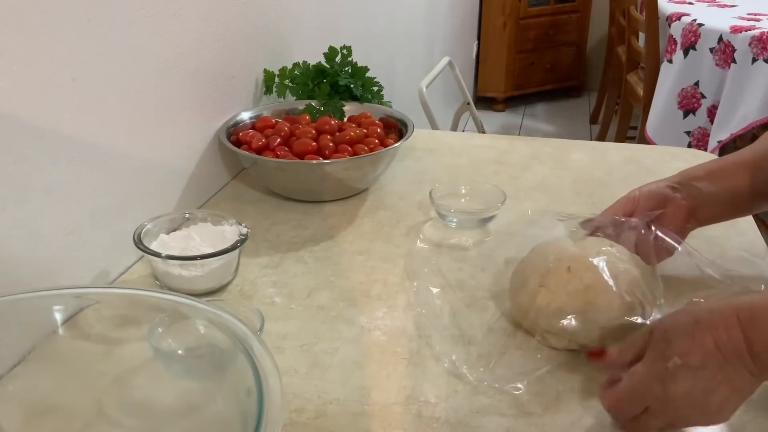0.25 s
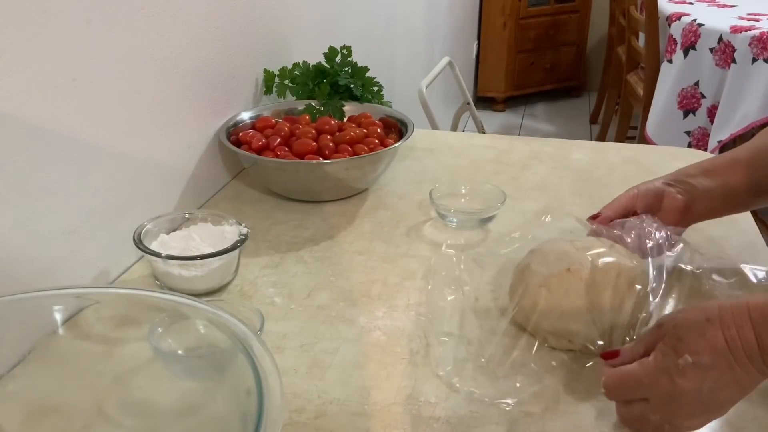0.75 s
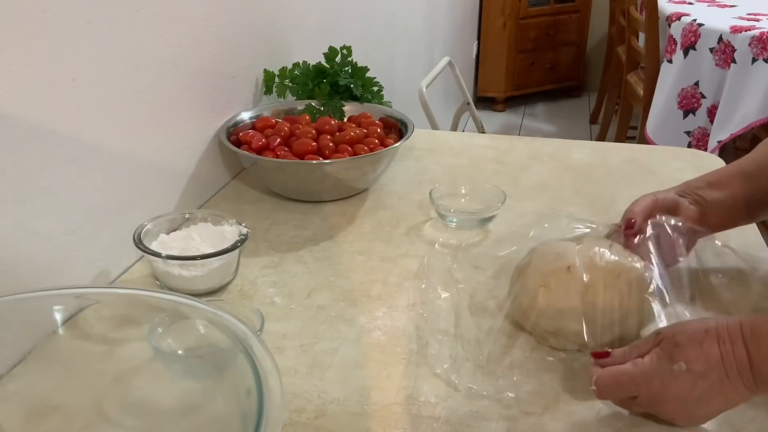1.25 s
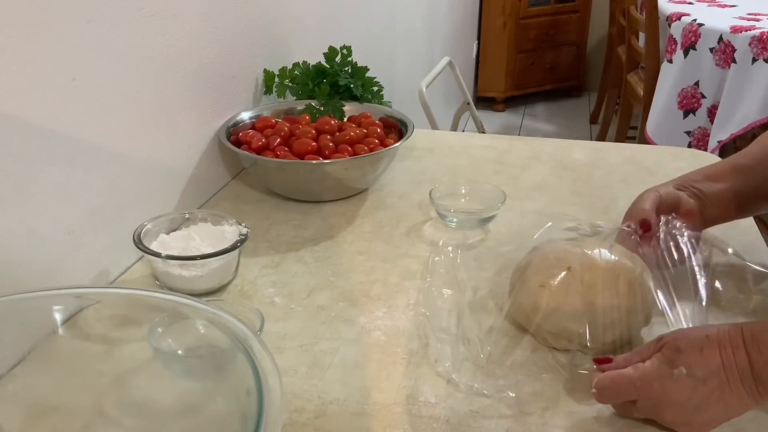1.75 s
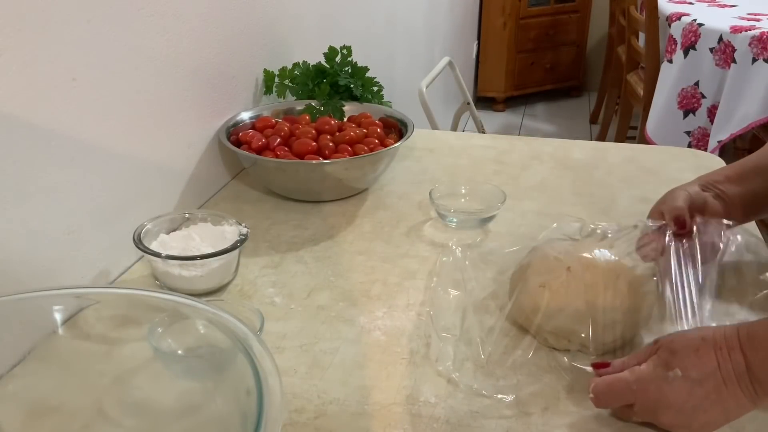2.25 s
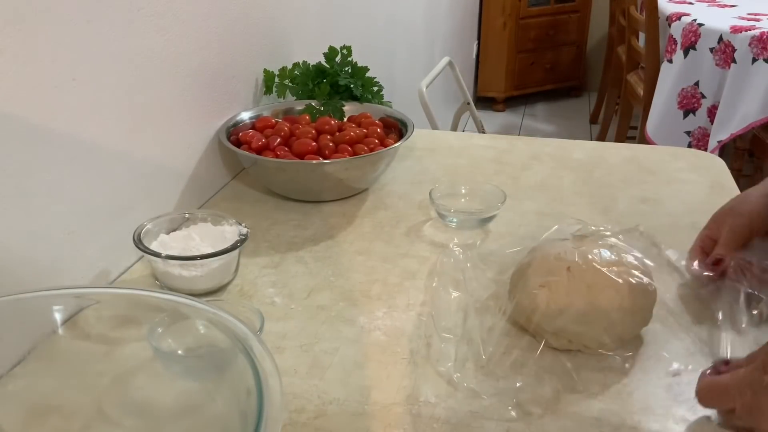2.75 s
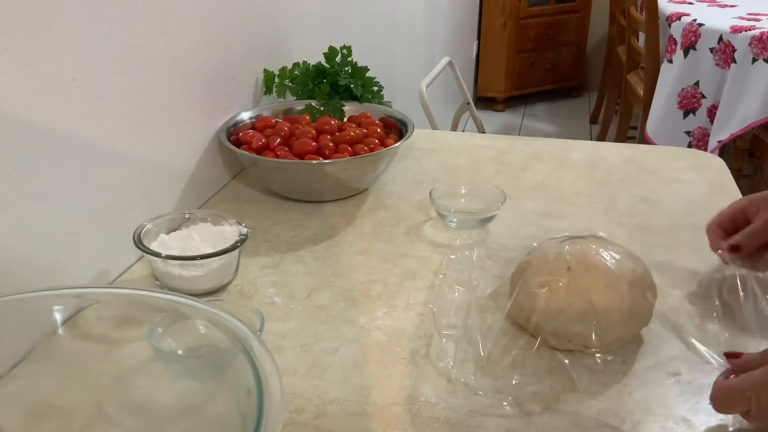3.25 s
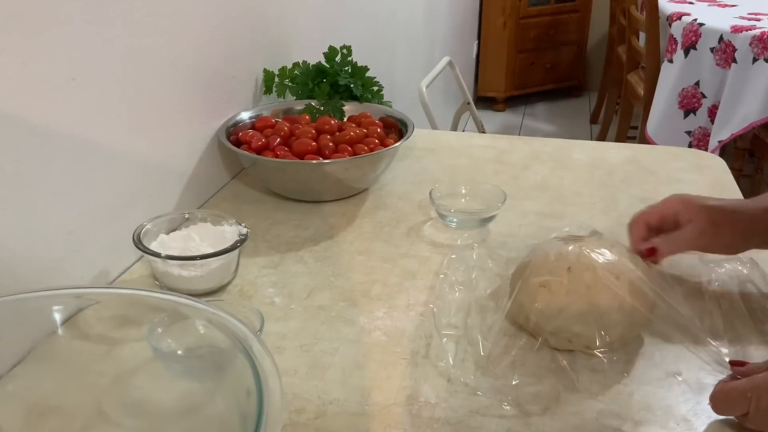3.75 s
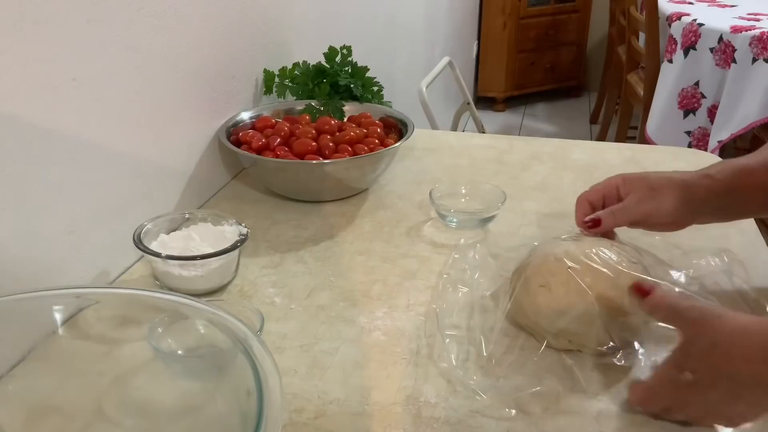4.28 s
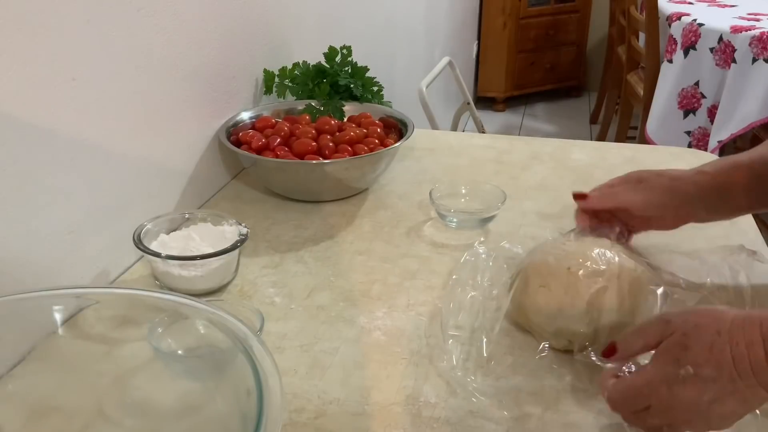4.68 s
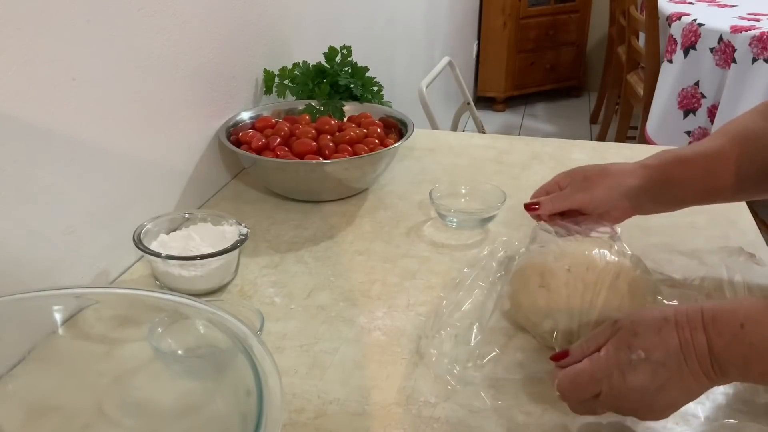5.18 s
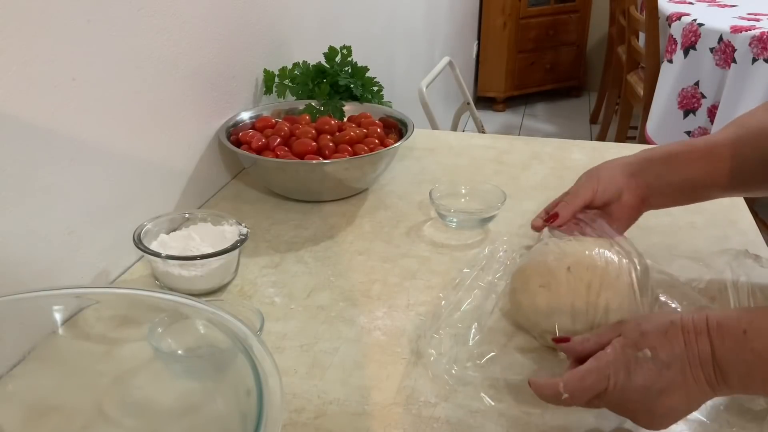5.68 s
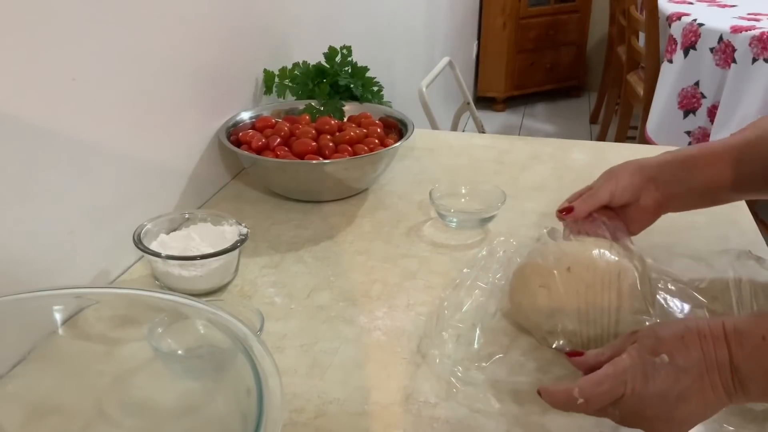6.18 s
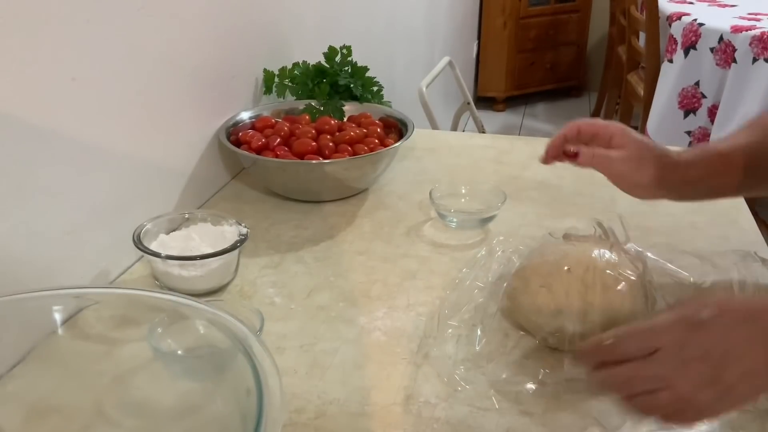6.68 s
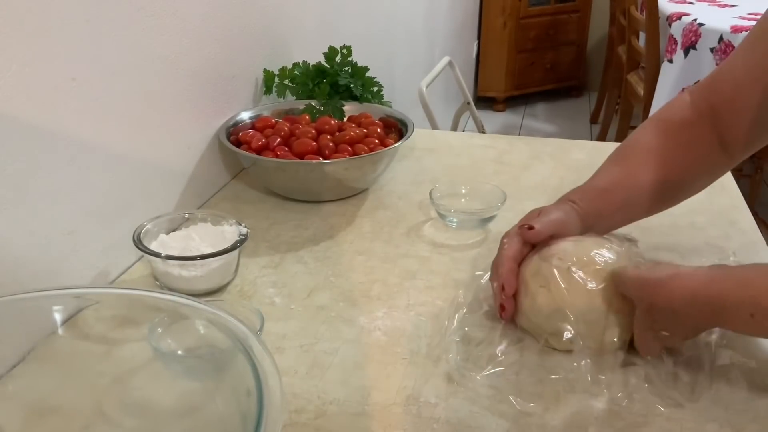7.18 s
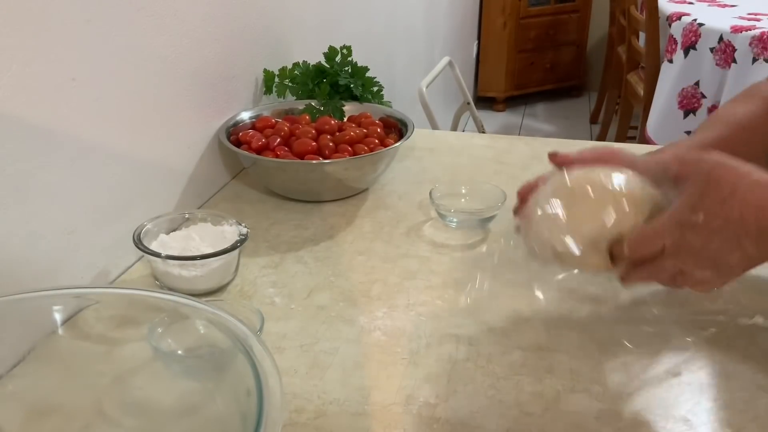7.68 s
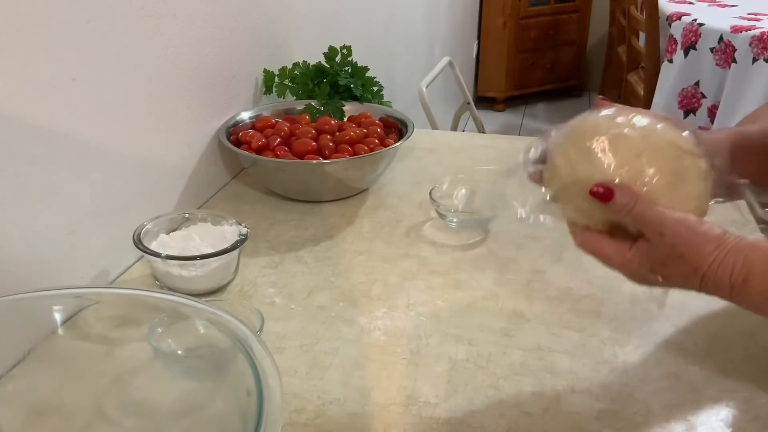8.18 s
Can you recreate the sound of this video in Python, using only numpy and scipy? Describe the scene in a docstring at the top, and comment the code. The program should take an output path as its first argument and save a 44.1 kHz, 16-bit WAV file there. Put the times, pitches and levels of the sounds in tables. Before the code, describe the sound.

In a hard-walled kitchen, hands work thin plastic film over dough on a table. Fine high clicks swarm and stop, with separate crisp snaps on top. Early pulls are light with muffled knocks, then the film pops strongly near three seconds, eases into gentle crinkles, and crackles again at the end. The microphone is near, the film right of centre, with a short room tail and a weak low hum.

```python
"""Cling film at a kitchen table

Cling film is pulled, folded and wrapped around dough, to the right of a stereo microphone close by.
The sheet buckles in swarms of random tiny clicks, and listed creases snap with a sharp click and a chatter.
Hands and dough bump the table: noise knocks and scuffs over decaying sines of the table top.
Decaying noise tails give the hard-walled kitchen; wavering tones and shaped noise hum as an appliance."""
import sys
import numpy as np
from scipy import signal
from scipy.fft import rfft, irfft, next_fast_len
from scipy.io import wavfile
from scipy.ndimage import uniform_filter1d, map_coordinates

SR = 44100
rng = np.random.default_rng(int(sys.argv[2]) if len(sys.argv) > 2 else 0)


def dump(signal):
    """Clip the signal to [-1, 1] and save it as 16-bit WAV at the path in sys.argv[1]."""
    limited = np.clip(np.atleast_2d(signal).T, -1, 1)
    pcm = np.round(limited * 32767).astype(np.int16)
    wavfile.write(sys.argv[1], SR, pcm)


N = 372159  # length in samples
TOP_HZ = 15900  # band limit of the microphone

# colour of a click from one crease: (frequency [Hz], relative level [dB])
CREASE_COLOUR = [(200, -58), (800, -23), (1500, -9.5), (2500, -10.5), (5000, -6), (8000, -7.5), (10500, 0),
                 (12700, 5), (15600, 3.5)]


def amp(db):
    """Decibels to gain."""
    return 10 ** (np.asarray(db) / 20)


def unit(x):
    """Scale to rms 1."""
    return x / np.sqrt(np.mean(x ** 2) + 1e-20)


def along(points, hz):
    """Read (Hz, value) points on a log frequency axis."""
    point_hz, values = np.transpose(points)
    return np.interp(np.log(hz + 1), np.log(point_hz), values)


def wobble(rate):
    """A smooth random curve with rate knots a second."""
    knots = rng.standard_normal(int(N * rate / SR) + 4)
    return map_coordinates(knots, [np.arange(N) * rate / SR], order=2)


def filtered(x, response):
    """Multiply the spectrum of x by a response of frequency."""
    size = next_fast_len(N + 8192)
    spectrum = rfft(x, size) * response(np.fft.rfftfreq(size, 1 / SR))
    return irfft(spectrum, size)[..., :N]


def audible(x):
    """Root energy of a short sound below the band limit."""
    hz = np.fft.rfftfreq(len(x), 1 / SR)
    return np.linalg.norm(irfft(rfft(x) * (hz < TOP_HZ)))


def click(spectrum, ripple_db, size=512):
    """A causal click of audible energy 1 with the given colour and random resonances of its own."""
    hz = np.fft.rfftfreq(size, 1 / SR)
    ripple = unit(uniform_filter1d(rng.standard_normal(len(hz)), size=12))
    # folding the cepstrum onto positive times gives minimum phase: the energy comes first
    cepstrum = irfft(np.log(amp(along(spectrum, hz) + ripple_db * ripple)))
    cepstrum[1:size // 2] *= 2
    cepstrum[size // 2 + 1:] = 0
    pulse = irfft(np.exp(rfft(cepstrum)))
    return pulse / audible(pulse)


def add(track, s, sound):
    """Mix a sound into a track at time s."""
    part = track[max(round(s * SR), 0):][:len(sound)]
    part += sound[:len(part)]


def air(spectrum):
    """Steady stereo noise of rms 1, alike on both sides in the bass."""
    # background: (frequency [Hz], left-right correlation [-1 to 1])
    alike = [(40, 1), (120, 0.85), (300, 0.82), (450, 0.43), (600, 0.02), (1500, -0.0085)]

    def mid_side_gains(hz):
        turn = np.arccos(np.clip(along(alike, hz), -1, 1)) / 2
        return amp(along(spectrum, hz)) * [np.cos(turn), np.sin(turn)]

    mid, side = filtered(rng.standard_normal((2, N)), mid_side_gains)
    return unit(np.array([mid + side, mid - side]))


def appliance():
    """Motor tones wavering in level and phase, over a low drone and a faint hiss."""
    # motor tones: (frequency [Hz], rms level before the swell [dB], flutter [dB], phase wander [rad])
    hum = [(43.5, -72, -5, 0.99), (119.2, -67, -2, 0.66), (134, -69, -1, 1.07), (210.8, -68.5, 3.5, 0.64),
           (241, -78, 4, 3.6), (271.6, -65.5, 7, 0.88), (288.3, -67, 8, 1.03), (332, -64, 2.5, 0.99),
           (367, -68.5, 3.5, 1.17), (414.9, -63, 1.24, 0.76)]
    # the hum swells a little midway: (time [s], level [dB])
    swell = [(0, -6.5), (3.4, -2.5), (4, 4), (5.1, -1), (6.2, -3.5), (8.4, -5)]
    # noise colours: (frequency [Hz], relative level [dB])
    drone = [(15, -71), (25, -36), (48, -3), (91, -5.5), (105, -19), (124, 2.5), (178, -5.5), (267, 3.5),
             (301, 0), (330, 1), (389, -3), (419, -3.5), (438, -2), (541, -16), (900, -23.5), (1170, -29),
             (1980, -120)]
    hiss = [(300, 3.5), (700, 5), (1100, 0), (2000, -13), (4000, -74), (9000, -20), (15000, -7.5)]
    swell_hz, swell_width_hz = 323, 53  # the tones near here take part in the swell
    t = np.arange(N) / SR
    swell_db = np.interp(t, *np.transpose(swell))
    tones = np.zeros(N)
    for hz, db, flutter_db, wander in hum:
        flutter = amp(flutter_db * wobble(9))
        tone = unit(flutter * np.sin(2 * np.pi * hz * t + wander * wobble(7)))
        share = np.exp(-((hz - swell_hz) / swell_width_hz) ** 2)
        tones += amp(db + swell_db * share) * tone
    return tones + amp(-56.0) * air(drone) + amp(-61.5) * air(hiss)


def handling():
    """Crackle and flex levels in dB: each pull takes up the film, works it, lets go, and the film settles."""
    # pulls and folds: (start [s], length [s], relative fine crackle [dB],
    # relative flexing of the wide sheet [dB], rise from start to end [dB])
    pulls = [(0.01, 0.038, -57, -61, 3), (0.348, 0.12, -63, -67, -2), (0.512, 0.026, -55, -71, 6),
             (0.552, 0.13, -46, -54, -5), (1.033, 0.24, -56, -60.5, -5), (1.327, 0.11, -68.5, -76, -3),
             (1.495, 0.094, -56, -58, 11), (1.623, 0.16, -51.5, -55.5, -4), (1.989, 0.1, -49, -54.5, 5),
             (2.137, 0.078, -46.0, -52, -2.0), (2.23, 0.15, -52.0, -59.5, 1.0),
             (2.458, 0.18, -59.0, -58.5, 11.0), (2.676, 0.043, -44, -47.5, 0),
             (2.761, 0.08, -40.0, -45, -7.0), (3.169, .03, -51, -50, 10), (3.207, 0.08, -40.5, -43.5, 0),
             (3.379, 0.037, -56.0, -79, -5.5), (3.685, 0.052, -50.5, -53.5, 11),
             (3.744, 0.087, -42.5, -47.5, -2.0), (3.966, 0.22, -62.0, -67, -8.0),
             (4.331, 0.065, -53, -58.5, 5), (4.415, 0.041, -43.5, -49, -3), (4.751, .11, -70, -83, 7.5),
             (4.869, 0.17, -52, -58, 11), (5.199, 0.24, -66.0, -69.5, 2), (5.49, 0.15, -55, -62.5, 8),
             (5.665, .025, -44, -54, -5.5), (5.879, 0.24, -58.0, -64, 12.0),
             (6.351, 0.059, -60, -65.5, -10), (6.476, 0.066, -62.0, -67, -3.5),
             (6.633, 0.21, -73, -69, 9.5), (6.885, 0.39, -57.5, -62.5, -14.0),
             (7.293, 0.17, -54, -63.5, 4.5), (7.47, 0.21, -53.5, -64.5, 3), (7.72, 0.086, -51, -61, 2.5),
             (7.815, 0.013, -43, -47, -3), (8.032, 0.071, -53, -75, 2.5), (8.129, 0.07, -44.5, -51, 4.5),
             (8.213, 0.12, -47, -54, 2), (8.43, 0.036, -51.5, -61, -0.5)]
    grip_db_per_s, release_db_per_s = 310.5, 699  # the hands take up the film and let it go
    tug_s = .05  # steepens the grip, most for pulls shorter than this: they start abruptly
    settle_db, settle_db_per_s = -13, 75  # the slack film goes on creeping after a pull
    idle_crackle_db, idle_flex_db = -84, -79  # film that is only being held
    cling_depth_db, cling_rate = 2, 25  # the film clings and gives: depth, and knots a second
    t = np.arange(N) / SR
    crackle = np.full(N, amp(idle_crackle_db) ** 2)
    flex = np.full(N, amp(idle_flex_db) ** 2)
    for s, length, crackle_db, flex_db, rise_db in pulls:
        near = slice(max(round((s - .5) * SR), 0), round((s + length + 1) * SR))
        age = t[near] - s
        before, after = np.maximum(-age, 0), np.maximum(age - length, 0)
        work_db = rise_db * (np.clip(age / length, 0, 1) - .5)
        grip_db = -grip_db_per_s * (1 + tug_s / length) * before
        fade_db = np.maximum(-release_db_per_s * after, settle_db - settle_db_per_s * after)
        shape_db = work_db + grip_db + fade_db
        crackle[near] += amp(crackle_db + shape_db) ** 2
        flex[near] += amp(flex_db + shape_db) ** 2
    cling_db = cling_depth_db * wobble(cling_rate)
    return 10 * np.log10(crackle) + cling_db, 10 * np.log10(flex) + cling_db


def swarm(spectrum, rate, spread_db, clump_db, count=16):
    """Tiny buckles at rms 1, rate a second, from several facets of film that each ring differently."""
    out = np.zeros(N)
    for _ in range(count):
        at = np.flatnonzero(rng.random(N) < rate / count / SR)
        sizes = amp(spread_db * np.minimum(rng.standard_normal(len(at)), 2))
        pulses = np.zeros(N)
        # dividing by the root of the rate keeps the level steady where buckles are dense
        pulses[at] = rng.choice([-1, 1], len(at)) * sizes / np.sqrt(rate[at])
        out += signal.oaconvolve(pulses, click(spectrum, ripple_db=1.5))[:N]
    # a fast random level gathers the buckles in clumps
    return unit(out * amp(clump_db * wobble(140)))


def rustle():
    """Harder handling makes the buckles both louder and denser; stray ticks stand out of the swarm."""
    # colours of fine buckles and of the wide sheet: (frequency [Hz], relative level [dB])
    crackle_colour = [(300, -64), (1200, -39.5), (3000, -8.5), (4800, -12), (6500, -7.5), (8500, -2.5),
                      (10500, 3), (12700, 6), (15600, 3.5)]
    flex_colour = [(300, -37.5), (650, -11), (980, -3.5), (1170, -5), (1520, 1.5), (1900, -5.5),
                   (2300, -2.5), (2950, -1), (3400, -5.5), (4700, -0.5), (9000, -16)]
    fine_db, flex_db = handling()
    busy = amp(.62 * (fine_db + 52))
    buckles = swarm(crackle_colour, 3400 * busy, spread_db=6.5, clump_db=3.2)
    fine = amp(fine_db + 2.0) * buckles
    wide = amp(flex_db - 3.5) * swarm(flex_colour, 2400 * busy, spread_db=3.5, clump_db=2.5)
    # the number of stray ticks grows more slowly than the swarm
    strays = swarm(CREASE_COLOUR, 60 * np.sqrt(busy), spread_db=4.5, clump_db=0.5, count=6)
    ticks = amp(-59.0 + 1.2 * (fine_db + 52.5)) * strays
    return fine + wide + ticks


def snaps():
    """A crease flips with one sharp click, and the film around it chatters briefly."""
    # creases that snap through: (time [s], relative level [dB],
    # thinness: tilt below 11 kHz, positive thinner, negative fuller [dB per octave])
    creases = [(0.0281, -40, 3), (.168, -40.5, -0.5), (.3471, -40, -2), (0.3577, -40.5, 4), (.378, -44, -1),
               (0.497, -38.5, -1), (0.5114, -38, 0), (.523, -36, -1.5), (.541, -25, 2), (0.581, -26, 3),
               (0.6166, -37, -4), (.7336, -43, -2), (.9, -48, 6), (0.9062, -49.5, -3), (0.916, -48, 0),
               (.9377, -44.5, 0), (.9611, -48, -0.5), (1.0296, -53, 6), (1.0428, -46, 5), (1.0772, -40, -1),
               (1.1198, -34.5, -2.5), (1.1903, -37, 11), (1.2513, -34, 5.5), (1.4372, -45, -0.5),
               (1.4674, -40.5, 0.5), (1.493, -42, 1), (1.4977, -38, -0.5), (1.5534, -36, 2),
               (1.6789, -38.5, -8.5), (1.7861, -35, 4), (1.942, -41, -2), (1.978, -36, 16),
               (2.002, -47, 10), (2.0226, -39, 3), (2.0308, -30.5, 1), (2.065, -38, -3), (2.13, -36.5, -4),
               (2.139, -37, 9), (2.164, -23.5, 5), (2.1752, -31, -5), (2.2023, -37, -5), (2.21, -32, 11),
               (2.2795, -34, -5), (2.3403, -31, -1), (2.458, -43, 2), (2.6436, -31, -0.5),
               (2.6536, -35, 12), (2.672, -25.5, 1.2), (2.732, -37, 3), (2.747, -36, 3), (2.754, -18, 0),
               (2.7587, -10.5, -0.8), (2.8009, -25, 13), (2.8381, -35, -5), (2.9782, -43, -3),
               (3.0858, -45, 2), (3.1564, -35.5, 6), (3.178, -28, -2.5), (3.191, -31, 2), (3.2016, -23, 10),
               (3.2094, -15.5, 0.5), (3.2134, -27, 7), (3.225, -34, 4), (3.2735, -24, 7),
               (3.2827, -17.5, 0), (3.5138, -44, 1), (3.5799, -51, 3), (3.6739, -46, -2), (3.6859, -38, 1),
               (3.7239, -43, 3), (3.981, -39, -4), (3.996, -40.5, -2), (4.0513, -48, 7), (4.2364, -42, -2),
               (4.242, -43, -2.5), (4.2905, -40, -4), (4.3329, -39, -4), (4.435, -25.5, 1.2),
               (4.4808, -21.5, -0.3), (4.5858, -36, 3), (4.841, -48, 0), (4.8654, -48, 1.5),
               (4.883, -42, 1), (4.891, -33, 2), (4.9055, -45, 3), (4.9269, -41, 1), (4.9493, -44, 12),
               (5.016, -30, 4), (5.0275, -39, -9), (5.179, -46, 8), (5.321, -42, 1), (5.4519, -41, -2),
               (5.4962, -38, 1.5), (5.5046, -35.5, 5), (5.5847, -37, -3), (5.6227, -32.5, -0.3),
               (5.6562, -23.5, -1.2), (5.665, -31, -2), (5.7081, -24, -0.1), (5.8029, -41, 1),
               (5.8434, -45, -3), (5.8777, -46, -1), (5.8851, -31, -1), (6.0072, -39.5, -3.5),
               (6.0131, -37.5, 0), (6.0501, -43, -3.5), (6.0844, -27.5, 1), (6.1023, -32, 4.5),
               (6.358, -49, 3), (6.4207, -42, 6), (6.4739, -51.5, 1), (6.5142, -41, 1.5), (6.8877, -42, -3),
               (6.99, -41, 7), (7.1254, -43.5, -3), (7.177, -39, -2.5), (7.2596, -40, -0.5),
               (7.333, -56, 5), (7.6267, -35.5, 6), (7.7051, -34, 1), (7.7277, -43, 1), (7.7518, -48, 1),
               (7.812, -25, 0.5), (7.819, -19.5, -1.3), (7.8273, -39.5, -2.5), (7.934, -39, 3),
               (7.9761, -46, 0), (7.997, -43, 1), (8.0247, -40, 18), (8.0303, -51, -3), (8.0775, -43, -3),
               (8.158, -22, -2)]
    pivot_hz, chatter, chatter_t60 = 11000, .3, .014  # tilt pivot, chatter gain, its decay by 60 dB in s
    out = np.zeros(N)
    t = np.arange(SR // 20) / SR
    for s, db, thin_db in creases:
        burst = chatter * rng.standard_normal(len(t)) * amp(-60 * t / chatter_t60)
        burst[0] = 1
        # each snap's colour tilts below the pivot
        colour = [(hz, level + thin_db * min(np.log2(hz / pivot_hz), 0)) for hz, level in CREASE_COLOUR]
        snap = signal.fftconvolve(burst, click(colour, ripple_db=0.34))
        add(out, s + .0005, amp(db + 13) * snap / audible(snap))  # sounds 0.5 ms after the listed time
    return out


def bumps(pat_t60=0.036):
    """Hands and dough land with one dull knock and a brief scuff, and ring the table top."""
    # landings: (time [s], relative boom of the table top [dB], relative pat of the contact [dB],
    # hardness: extra pat above about 800 Hz, negative softer [dB])
    landings = [(0.2067, -56, -42, 7), (0.2181, -45.5, -58, 3), (0.253, -61, -51, 2),
                (0.8082, -61, -43.5, 10.5), (0.86, -58, -58, 1), (1.341, -57.5, -43.5, -5.5),
                (1.409, -62, -51, -7), (1.765, -54, -42.5, -8), (1.815, -57, -52, -19),
                (2.323, -78, -44, 0), (7.822, -60, -41, 3)]
    # modes of the table top: (frequency [Hz], relative level [dB], decay by 60 dB [s])
    modes = [(63.6, -23, 0.17), (120.3, -1.5, 0.5), (144.3, 8, 0.19), (207.4, 2.5, 0.084),
             (255, -1.5, 0.022), (348, -7.5, 0.088), (468, -5, 0.13)]
    # colour of the contact: (frequency [Hz], relative level [dB])
    pat_colour = [(20, -10), (60, 5), (150, 0), (290, 10.5), (400, -0.5), (540, -6), (850, -12.5),
                  (1200, -28), (2500, -74)]
    knock_db, scuff_db = 22, 1.5  # the single push of the contact, and the scuff that follows it
    out = np.zeros(N)
    t = np.arange(SR // 2) / SR
    soft_contact = 1 - np.exp(-t / .002)
    ring = sum(amp(level - 60 * t / t60) * np.sin(2 * np.pi * hz * t) for hz, level, t60 in modes)
    for s, boom_db, pat_db, hard_db in landings:
        colour = [(hz, level + hard_db * np.clip(np.log2(hz / 420), 0, 1)) for hz, level in pat_colour]
        force = amp(scuff_db - 60 * t / pat_t60) * soft_contact * rng.standard_normal(len(t))
        force[0] = amp(knock_db)
        pat = signal.fftconvolve(force, click(colour, ripple_db=2.0, size=2048))[:len(t)]
        add(out, s, amp(boom_db) * ring * soft_contact + amp(pat_db) * pat)
    return out


def kitchen(x, count=8):
    """Diffuse answer of the walls, as decaying noise; it changes as the hands move the source about."""
    # reverberation: (frequency [Hz], decay by 60 dB [s])
    room_t60 = [(150, 0.18), (1500, 0.45), (6000, 0.44), (14000, 0.26)]
    # walls over direct sound: (frequency [Hz], level [dB])
    room_db = [(150, -7.5), (700, 6.5), (3000, -1), (7000, 2.5), (10500, -3.5), (15000, -4.5)]
    noise = rng.standard_normal((count, 2, SR // 2))
    hz, t, bands = signal.stft(noise, SR, nperseg=256)
    decay = amp(-60 * t / along(room_t60, hz)[:, None]) * (1 - np.exp(-t / 0.00043))
    energy = np.mean(decay ** 2, axis=1, keepdims=True) * SR / 2
    decay *= amp(along(room_db, hz))[:, None] / np.sqrt(energy)
    tails = signal.istft(bands * decay, SR, nperseg=256)[1]
    # the source steps to the next place, with its own stereo tail, every 512 samples
    place = np.arange(N) // 512 % count
    out = np.zeros((2, N))
    for k, tail in enumerate(tails):
        out += signal.oaconvolve((x * (place == k))[None], tail, axes=1)[:, :N]
    return out


def scene():
    """The film lies to the right, so its direct sound reaches the left port of the microphone later."""
    # lag of the film's sound at the left port: (frequency [Hz], lag [s])
    port_lag_s = [(1150, .0013), (2250, .00111), (3350, .00105), (7500, .001), (8700, .000977),
                  (10150, .000936), (12750, .000902), (15250, .000885)]
    table_room_db = -3  # the table is close, so the walls add less to its bumps
    background = appliance()
    film = rustle() + snaps()
    table = bumps()
    left = filtered(film, lambda hz: np.exp(-2j * np.pi * hz * along(port_lag_s, hz)))
    walls = kitchen(film + amp(table_room_db) * table)
    return np.array([left, film]) + table + walls + background


def record(dry):
    """The microphone's steep low-pass keeps next to nothing above its band limit."""
    return filtered(dry, lambda hz: 1 / np.sqrt(1 + (hz / TOP_HZ) ** 240))


dry = scene()
out = record(dry)
dump(out)
```